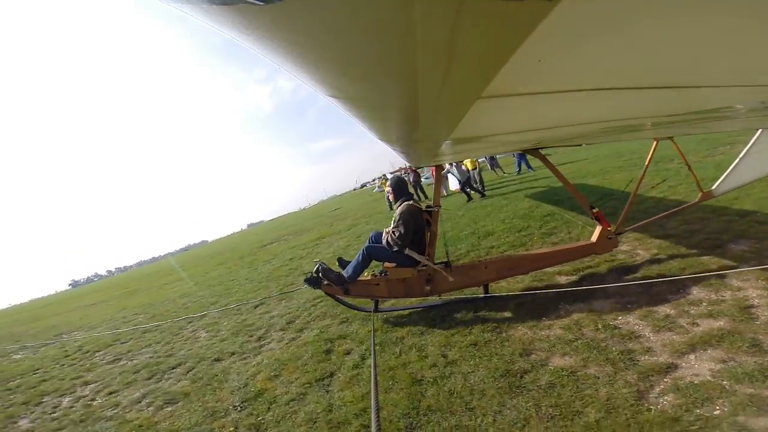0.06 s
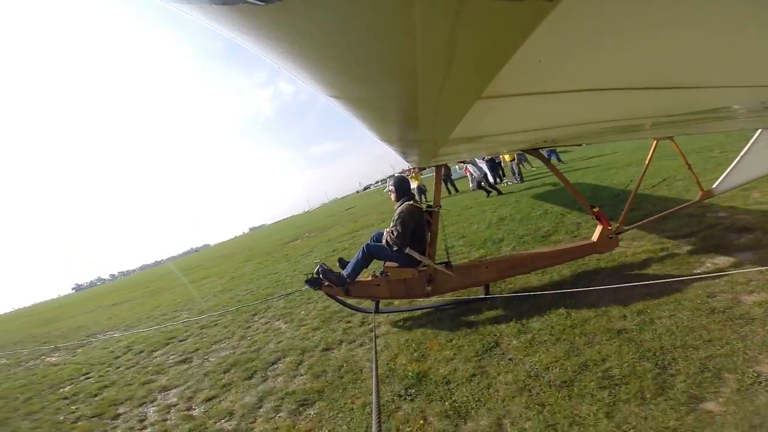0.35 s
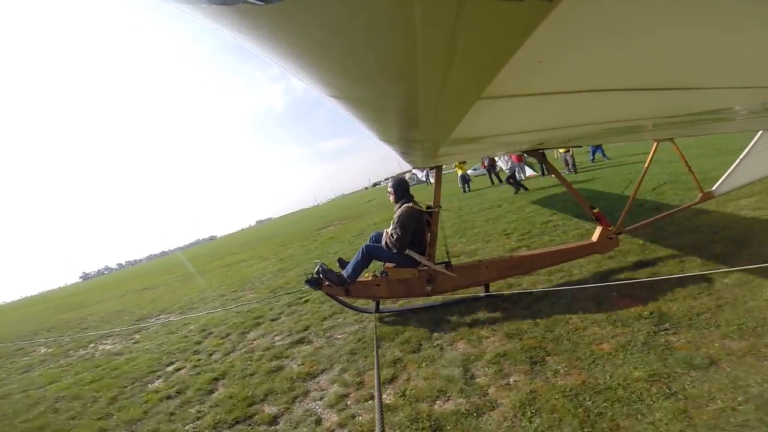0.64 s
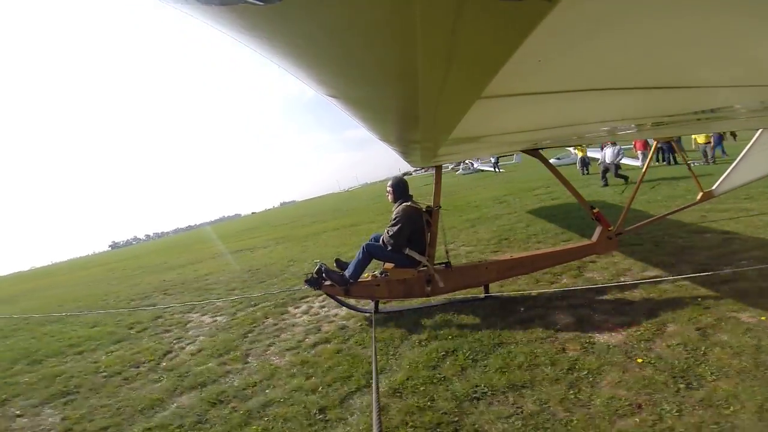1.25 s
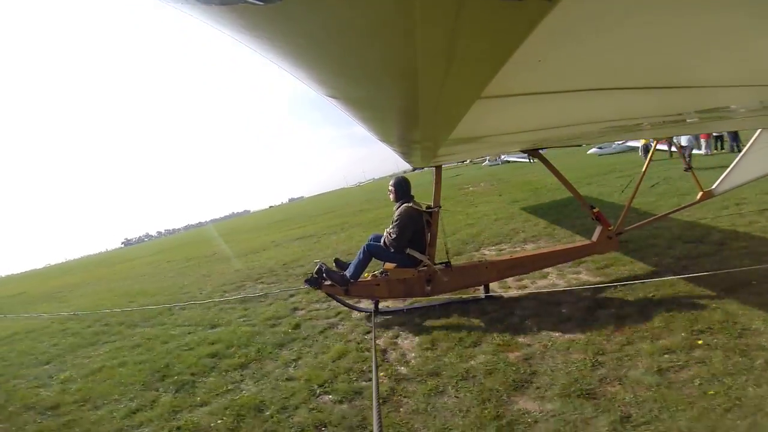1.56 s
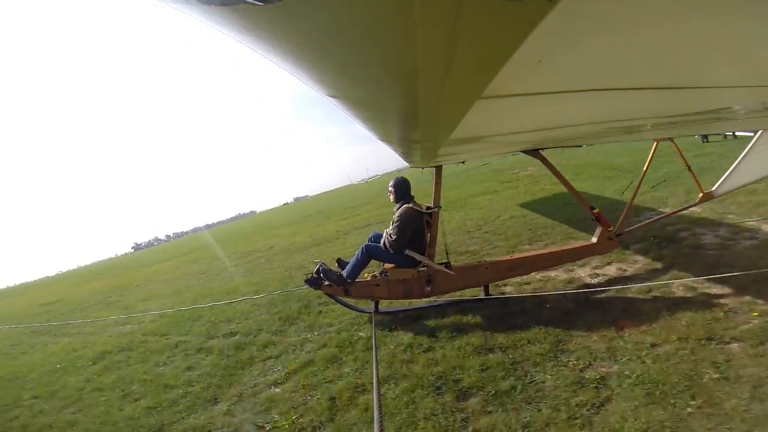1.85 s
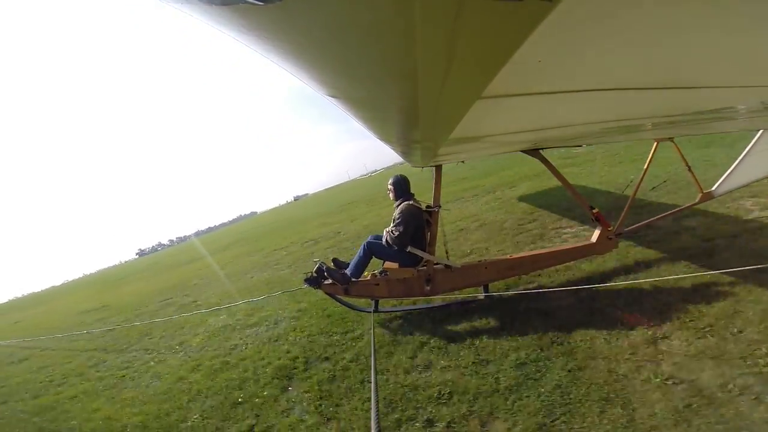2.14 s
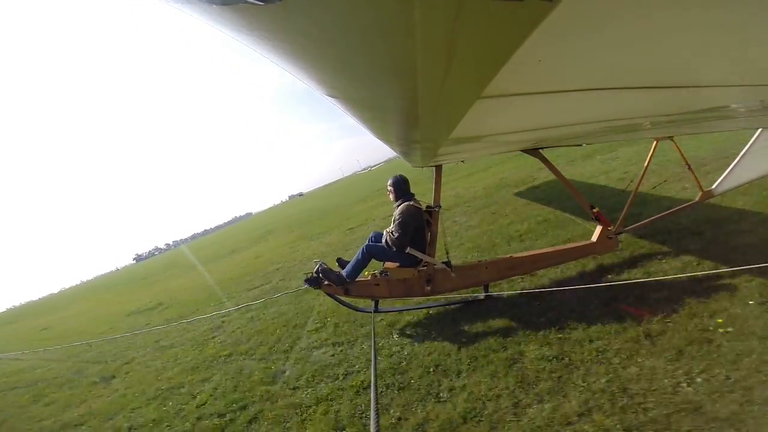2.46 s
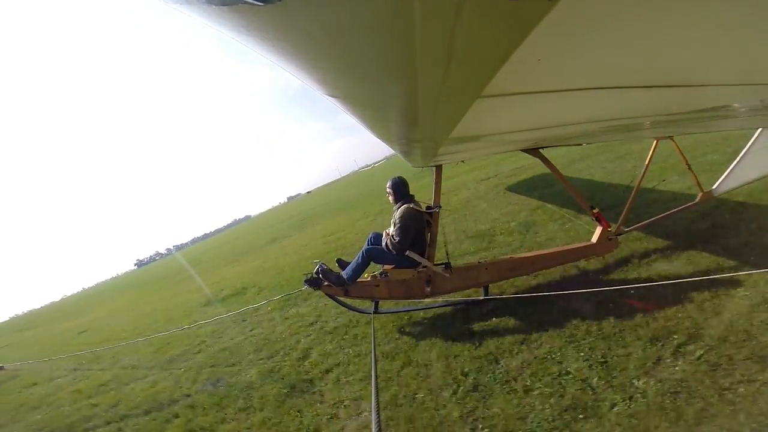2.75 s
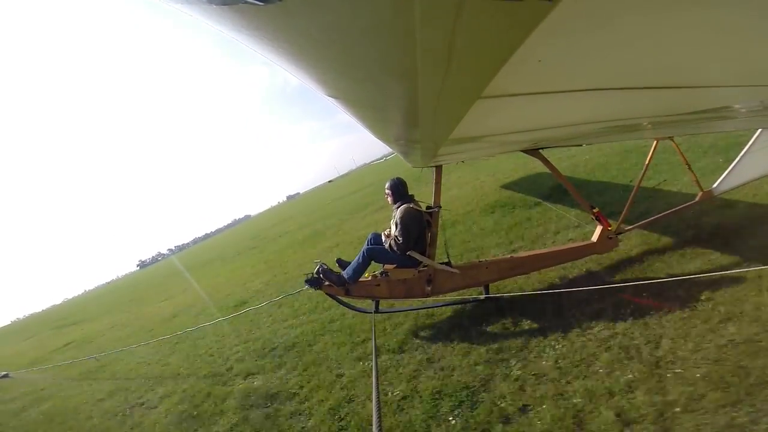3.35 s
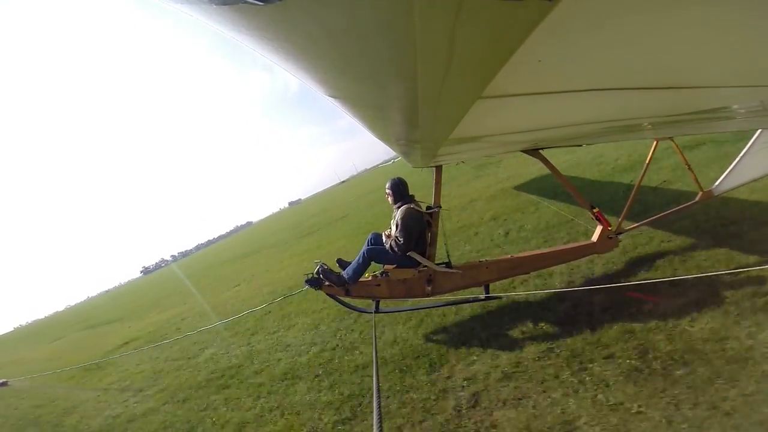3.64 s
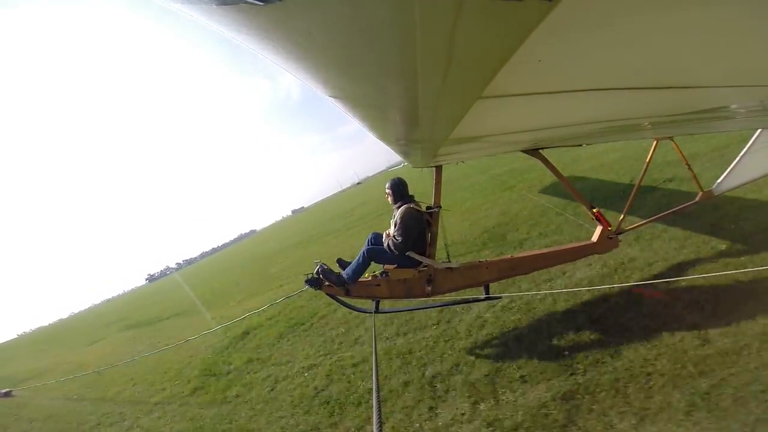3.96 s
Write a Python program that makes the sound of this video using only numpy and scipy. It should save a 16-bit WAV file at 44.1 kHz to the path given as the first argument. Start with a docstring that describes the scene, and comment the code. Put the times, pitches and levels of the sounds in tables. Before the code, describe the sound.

A glider's skid scrapes and bumps over grass, rattling, then lifts into whistling wind.

```python
"""A wooden glider's skid scrapes and bumps over a grass field under tow, heard from a microphone on the wing.
The ground shakes the wing in a few deep modes and jolts the fuselage; close by, loose fittings chatter,
struts rattle and a metal joint clanks. As the glider lifts the scrape dies away, leaving the wind
on the microphone and the rising whistle of the bracing wires."""
import sys
import numpy as np
from scipy import signal
from scipy.fft import rfft, irfft
from scipy.io import wavfile

SR = 44100
rng = np.random.default_rng(int(sys.argv[2]) if len(sys.argv) > 2 else 0)


def digitize_waveform(pressure):
    """Quantize a signal to 16-bit integers and store it at the path in sys.argv[1].

    Rows of a 2-D input are taken as channels; values are limited to [-1, 1].
    """
    field = np.atleast_2d(pressure).T
    bounded = np.clip(field, -1, 1)
    quanta = np.round(bounded * 32767).astype(np.int16)
    wavfile.write(sys.argv[1], SR, quanta)


N = 176400
TIME = np.arange(N) / SR
LIFT_S, LIFT_DB_PER_S = 3.47, 37  # the skid leaves the ground; how fast its scrape and the rattle fade


def amp(db):
    """Decibels to gain."""
    return 10 ** (np.asarray(db) / 20)


def unit(x):
    """Scales to an rms of one."""
    return x / np.sqrt(np.mean(abs(x) ** 2) + 1e-20)


def curve(rows, column=1):
    """One column of a time table, at every sample."""
    rows = np.array(rows)
    return np.interp(TIME, rows[:, 0], rows[:, column])


def add(mix, start_s, sound):
    """Mixes a sound in at a time."""
    part = mix[max(0, round(start_s * SR)):][:len(sound)]
    part += sound[:len(part)]


def colour(x, spectrum, peaks=(), size=8192):
    """Causal filter of unit energy from a spectrum and its resonances."""
    hz = np.fft.rfftfreq(size, 1 / SR)
    points_hz, points_db = np.transpose(spectrum)
    shape_db = np.interp(np.log(hz + 1), np.log(points_hz + 1), points_db)
    shape_db += sum(db / (1 + (2 * (hz - centre) / width) ** 2) for centre, width, db in peaks)
    cepstrum = irfft(np.log(amp(shape_db)))
    cepstrum[1:size // 2] *= 2  # folded for minimum phase
    cepstrum[size // 2 + 1:] = 0
    response = irfft(np.exp(rfft(cepstrum)))[:size // 2]
    return signal.oaconvolve(x, response / np.linalg.norm(response))[:len(x)]


def drift(rate_hz):
    """Complex random wander, with little above the rate."""
    noise = rng.standard_normal(N) + 1j * rng.standard_normal(N)
    return unit(np.fft.ifft(np.fft.fft(noise) / (1 + (np.fft.fftfreq(N, 1 / SR) / rate_hz) ** 4)))


def swing(hz, width_hz, steady):
    """A randomly driven resonance whose swing is evened out by `steady`, from 0 to 1."""
    envelope = drift(width_hz * 0.75)
    envelope /= (abs(envelope) ** 2 + 0.16) ** (steady / 2)
    carrier = np.exp(2j * np.pi * np.cumsum(hz * np.ones(N)) / SR)
    return unit((envelope * carrier).real)


def ring(modes, t):
    """Decaying modes of a struck part."""
    return sum(amp(db - 60 * t / t60) * np.sin(2 * np.pi * (hz * t + rng.random()))
               for hz, db, t60 in modes)


def burst(t, decay_s, rise=1):
    """A dying scuff of noise with unit energy."""
    scuff = rng.choice([-1, 1], len(t)) * rise * np.exp(-t / decay_s)
    return scuff / np.linalg.norm(scuff)


# wind right at the microphone: t/s, level/dB
WIND_LEVEL = [(0, -35), (1.5, -31), (3.3, -29), (4, -34)]
# its spectrum: f/Hz, relative level/dB
WIND_SPECTRUM = [(10, 6.5), (27, 22.5), (40, 20), (100, 9.5), (190, 7), (330, 4), (500, -6.5), (900, -3.5),
                 (1300, -13), (1600, -16.5), (2700, -22.5), (3500, -30.5), (6000, -51.5), (8000, -57),
                 (15000, -64)]

def wind(gust_db=4.5, gust_hz=8):
    """Air buffets the microphone in gusts, out in the open on the wing."""
    level_db = curve(WIND_LEVEL) + gust_db * drift(gust_hz).real
    return amp(level_db) * unit(colour(rng.standard_normal(N), WIND_SPECTRUM))


# airflow over the wing: t/s, level/dB
RUSH_LEVEL = [(0, -59), (2.5, -54), (3.5, -53), (3.75, -44), (4, -39.5)]
# its spectrum: f/Hz, relative level/dB
RUSH_SPECTRUM = [(200, -4.5), (600, 2), (1300, 3.5), (1600, 5.5), (2100, -2.5), (2750, -5.5), (3100, -12),
                 (4200, -17.5), (6200, -22.5), (7200, -34.5), (10000, -35.5), (15000, -44)]

def rush():
    """Air hisses past the wing around the microphone, louder with speed."""
    return amp(curve(RUSH_LEVEL)) * unit(colour(rng.standard_normal(N), RUSH_SPECTRUM))


# whistle of the wires: t/s, f/Hz, level/dB
WHISTLE = [(2.9, 985, -66), (3.49, 1061, -41.5), (3.59, 1098, -44), (3.68, 1130, -40.5), (3.8, 1150, -36.5),
           (3.88, 1128, -35.5), (4, 1150, -32.5)]
# its tones: pitch ratio, width/Hz, relative level/dB
WHISTLE_TONES = [(1, 48.6, -2), (1.13, 160, -7)]

def wires(steady=0.17):
    """The bracing wires, a little way along the wing, whistle higher and louder with airspeed."""
    pitch_hz = curve(WHISTLE)
    tones = sum(amp(db) * swing(ratio * pitch_hz, width, steady) for ratio, width, db in WHISTLE_TONES)
    return amp(curve(WHISTLE, column=2)) * tones


# crunching grass: t/s, level/dB
CRUNCH_LEVEL = [(.42, -74), (.6, -43.5), (.85, -60), (.99, -59), (1.06, -67), (1.48, -74), (1.82, -55),
                (1.98, -77), (2.17, -64), (2.3, -43), (2.39, -58.5), (2.6, -43), (2.78, -52), (3.05, -46.5),
                (3.3, -55), (3.5, -65), (4, -92)]
# bright spectrum of stalks and fittings alike: f/Hz, relative level/dB
CRACKLE_SPECTRUM = [(200, -32.5), (900, 4.5), (1800, 8), (2700, 8), (3900, -9), (4800, 2), (5450, -3),
                    (6300, 1.5), (7300, -2.5), (8600, -16), (10700, -15.5), (11400, -21), (12500, -19.5),
                    (13500, -19), (14300, -26), (16000, -39)]

def grass(cracks_per_s=2800, clump_db=23, clump_hz=109):
    """Down at ground level, stalks crunch under the skid in short clumps."""
    cracks = rng.standard_normal(N) * (rng.random(N) < cracks_per_s / SR)
    clumps = amp(clump_db * np.tanh(2.1 * drift(clump_hz).real))
    return amp(curve(CRUNCH_LEVEL)) * unit(colour(cracks * clumps, CRACKLE_SPECTRUM))


# modes of the wooden struts: f/Hz, relative level/dB, t60/s
STRUT_MODES = [(919, 2, 0.064), (1504, 3, 0.058), (1675, 1.5, .045)]

def struts(level_db=-48, follow=0.57, taps_per_s=140, vary_db=4, detune=0.037, rise_s=0.0008):
    """Nearby struts tap in their sockets, each tap its own colour, harder as the skid digs in."""
    taps, t = np.zeros(N), np.arange(SR // 10) / SR
    scrape_db = curve(SCRAPE_LEVEL)
    push_db = follow * (scrape_db - scrape_db.mean()) - lift_loss_db()
    for at in np.flatnonzero(rng.random(N) < taps_per_s / SR):
        modes = [(hz * (1 + detune * rng.standard_normal()), db + vary_db * rng.uniform(-1, 1), t60)
                 for hz, db, t60 in STRUT_MODES]
        add(taps, at / SR, amp(push_db[at]) * (1 - np.exp(-t / rise_s)) * ring(modes, t))
    return amp(level_db) * unit(taps)


# knocks of a metal joint: t/s, relative level/dB, pitch ratio, tilt of the ring/(dB per octave)
JOINT_KNOCKS = [(.924, -42, 1.1, 2), (1.663, -25, 1.02, -1.5), (2.018, -23.5, .995, 1.5),
                (2.487, -33, 1, 4)]
# its modes: f/Hz, relative level/dB, t60/s
JOINT_MODES = [(942, -1.5, .05), (1510, 0.5, 0.044), (1680, 1, 0.04), (1985, -6, .04), (2500, 3, 0.036),
               (3800, -11, 0.024), (4760, -8, 0.023)]
# spectrum of its grinding, also of knocks on the wood: f/Hz, relative level/dB
GRIND_SPECTRUM = [(200, -1.5), (900, -5), (2600, -5), (3500, -15), (7000, -24), (12000, -45)]

def clanks(gain_db=-13, grind_db=-1, grind_s=0.0072, rise_s=0.0044):
    """A joint close by grinds briefly and rings in its modes, duller or brighter with each knock."""
    out, t = np.zeros(N), np.arange(SR // 5) / SR
    rise = 1 - np.exp(-(t / rise_s) ** 2)
    for start, db, pitch, tilt_db in JOINT_KNOCKS:
        modes = [(hz * pitch, mode_db + tilt_db * np.log2(hz), t60) for hz, mode_db, t60 in JOINT_MODES]
        ringing = unit(rise * ring(modes, t))
        grinding = unit(rise * colour(burst(t, grind_s), GRIND_SPECTRUM))
        add(out, start, amp(db + gain_db) * (ringing + amp(grind_db) * grinding))
    return out


def contact(decay_s=0.0012, spread=0.58, tilt_db=0.75, size=1024):
    """A loose part scuffs for a millisecond or two, each time with its own length and brightness."""
    length, brightness = np.clip(rng.standard_normal(2), -2, 2)
    age = np.arange(size) / SR / (decay_s * np.exp(spread * length))
    scuff = rng.choice([-1, 1], size) * np.sqrt(age) * np.exp(-age)
    octaves = np.log2(np.clip(np.fft.rfftfreq(size * 2, 1 / SR), 2000, None) / 6000)
    scuff = irfft(rfft(scuff, size * 2) * amp(tilt_db * brightness * octaves))[:size]
    return scuff / np.linalg.norm(scuff)


def throw(shake, db_per_rms=6.5, limit_rms=2.44, waver_db=-0.5, waver_hz=6.1):
    """The chatter's gain rises with the airframe's acceleration, up to a limit, and wavers slightly."""
    motion = signal.sosfiltfilt(signal.butter(2, 200, fs=SR, output="sos"), shake)
    acceleration = unit(np.gradient(np.gradient(motion)))
    waver = np.tanh(2 * drift(waver_hz).real)
    return amp(db_per_rms * np.minimum(abs(acceleration), limit_rms) + waver_db * waver)


# chatter of loose fittings: t/s, level/dB
CHATTER_LEVEL = [(0, -56), (.5, -44.5), (.72, -45), (.84, -50), (.95, -46), (1.3, -55), (1.48, -49.5),
                 (1.6, -47.5), (1.93, -45), (1.98, -51.5), (2.18, -43.5), (2.39, -48), (2.6, -49.5),
                 (2.78, -55), (3.17, -47.5), (3.42, -51), (3.53, -59), (4, -67)]
# single snaps of a fitting: t/s, relative level/dB
FITTING_SNAPS = [(0.019, -35.5), (0.1161, -32), (0.307, -28), (0.421, -23.5), (0.469, -31), (0.4823, -25.5),
                 (0.492, -36), (0.533, -24), (0.5921, -26), (0.609, -25.5), (0.6749, -26.5), (0.7578, -27),
                 (0.799, -28.5), (0.897, -29.5), (0.9333, -28), (0.954, -26.5), (0.9752, -22),
                 (0.9949, -23.5), (1.054, -25.5), (1.067, -28), (1.1078, -27.5), (1.13, -26.5),
                 (1.2126, -27.5), (1.2464, -26.5), (1.2673, -36), (1.3795, -25), (1.41, -27.5),
                 (1.706, -29.5), (1.7896, -25.5), (1.833, -22.5), (1.872, -27.5), (1.914, -35),
                 (2.088, -27), (2.211, -26.5), (2.2569, -28), (2.582, -22), (2.593, -39), (2.606, -25.5),
                 (2.6968, -29), (2.7557, -32), (2.804, -31), (3.15, -27.5), (3.272, -41), (3.347, -42),
                 (3.39, -32)]

def fittings(shake, start_per_s=45, growth_per_s2=45, spread_db=4.5, snap_db=14, knock_db=-6, tail_db=-13):
    """Fittings around the microphone chatter ever faster; now and then one snaps and knocks the wood."""
    chatter, snaps, t = np.zeros(N), np.zeros(N), np.arange(SR // 20) / SR
    contacts_per_s = start_per_s + growth_per_s2 * TIME
    for at in np.flatnonzero(rng.random(N) < contacts_per_s / SR):
        add(chatter, at / SR, amp(spread_db * min(rng.exponential(), 2.5)) * contact())
    for start, db in FITTING_SNAPS:
        add(snaps, start, amp(db + snap_db) * burst(t, decay_s=0.0008, rise=np.sqrt(t)))
    hits = unit(chatter * throw(shake)) * amp(curve(CHATTER_LEVEL)) + snaps
    knocks = signal.oaconvolve(snaps, burst(t, decay_s=0.006))[:N]
    wood = colour(knocks, GRIND_SPECTRUM, FRAME_RESONANCES)
    tail = signal.oaconvolve(hits, burst(t, decay_s=0.0035))[:N]  # the structure rings on
    return colour(hits + amp(tail_db) * tail, CRACKLE_SPECTRUM) + amp(knock_db) * wood


# jolts of the fuselage: t/s, relative level/dB
JOLTS = [(0.173, -15), (0.461, -17), (.775, -18.5), (0.986, -12.5), (1.138, -15.5), (1.604, -16),
         (1.821, -18.5), (2.175, -10), (2.247, -15), (2.329, -11), (2.474, -19.5), (2.685, -12.5),
         (2.752, -8), (2.83, -17.5), (3.088, -12), (3.189, -15.5), (3.271, -10), (3.301, -13.5)]
# its modes: f/Hz, relative level/dB, t60/s
FUSELAGE_MODES = [(87.7, 7.5, 0.087), (124.6, 2, 0.082), (157, -8.5, 0.034), (241, -19, .06),
                  (325, -20.5, 0.057), (466, -18, 0.027)]

def thuds(rise_s=0.0024):
    """Jolts knock the wooden fuselage, inboard of the microphone."""
    out, t = np.zeros(N), np.arange(SR // 5) / SR
    rise = 1 - np.exp(-(t / rise_s) ** 2)
    for start, db in JOLTS:
        add(out, start, amp(db) * rise * ring(FUSELAGE_MODES, t))
    return out


# sway in the wing's lowest mode: t/s, level/dB
SWAY_LEVEL = [(0.0, -24.5), (0.2, -12.5), (0.82, -11), (0.91, -16), (1.48, -11.5), (1.51, -28.5),
              (1.6, -8.5), (1.84, -15), (1.88, -11.5), (1.96, -29.5), (2.03, -10.5), (2.64, -18.5),
              (3.11, -13.5), (3.17, -19.5), (3.55, -11), (3.62, -30.5), (3.8, -16.5), (3.86, -23.5)]
# shudder in its higher modes: t/s, level/dB
SHUDDER_LEVEL = [(0.0, -23.5), (0.2, -23), (0.24, -28.5), (0.46, -14), (0.95, -24.5), (0.99, -13.5),
                 (1.05, -20.5), (1.15, -16.5), (1.21, -26), (1.41, -18), (1.5, -20.5), (1.76, -19.5),
                 (1.83, -9.5), (1.97, -26), (2.27, -16.5), (2.41, -24.5), (2.48, -13.5), (2.53, -31.5),
                 (2.58, -10.5), (2.91, -21.5), (3.29, -19), (3.34, -30.5), (3.39, -20.5), (3.71, -21.5),
                 (4.0, -38.5)]
# those higher modes: f/Hz, width/Hz, relative level/dB
WING_MODES = [(95, 16.7, -1), (122.6, 28.3, -7)]

def wing(sway_hz=54.5, sway_width_hz=14.6, steady=0.44):
    """The ground shakes the wing in its deep modes, directly under the microphone."""
    sway = amp(curve(SWAY_LEVEL)) * swing(sway_hz, sway_width_hz, steady)
    shudder = sum(amp(db) * swing(hz, width, steady) for hz, width, db in WING_MODES)
    return sway + amp(curve(SHUDDER_LEVEL)) * shudder


def lift_loss_db():
    """The level lost as the skid lifts off the field."""
    return LIFT_DB_PER_S * np.maximum(TIME - LIFT_S, 0)


def grains(per_s=2400, spread_db=2):
    """Dense tiny impacts of stalks and soil."""
    size = amp(spread_db * np.minimum(rng.exponential(1, N), 4))
    return unit(size * rng.standard_normal(N) * (rng.random(N) < per_s / SR))


# scrape of the skid, before the lift fades it: t/s, level/dB
SCRAPE_LEVEL = [(0, -31), (.09, -51), (.17, -32), (.24, -55.5), (.33, -38), (.46, -42), (.57, -32.5),
                (.75, -31.5), (.83, -45.5), (.95, -40.5), (1.03, -44), (1.34, -45.5), (1.47, -43),
                (1.58, -32), (1.72, -40), (1.85, -26.5), (1.92, -45.5), (2.02, -34.5), (2.2, -34.5),
                (2.39, -50.5), (2.48, -28), (2.53, -38.5), (2.6, -34.5), (2.73, -29), (2.79, -43.5),
                (2.95, -36.5), (3.02, -47.5), (3.15, -34), (3.36, -39), (3.55, -41)]
# hummocks in its path: t/s, length/s, relative level/dB
HUMMOCKS = [(0.973, 0.027, -23), (0.985, 0.035, -29), (1.125, 0.015, -24.5), (1.759, 0.045, -25),
            (1.81, 0.06, -32), (2.15, 0.043, -25), (2.253, 0.022, -27.5), (2.319, 0.02, -31),
            (2.53, 0.07, -27.5), (2.741, 0.021, -30.5), (2.806, 0.028, -31), (3.076, 0.019, -25),
            (3.23, 0.018, -34.5), (3.271, 0.015, -24.5)]
# spectrum of the scrape: f/Hz, relative level/dB
SCRAPE_SPECTRUM = [(60, -18.5), (150, 13), (220, -0.5), (320, 3.5), (490, -5.5), (620, -2), (1000, -3),
                   (1330, -14.5), (1700, -10.5), (2200, -13.5), (2750, -21.5), (3300, -19.5), (4200, -29),
                   (7000, -38.5), (15000, -74.5)]
# resonances of the frame: f/Hz, width/Hz, gain/dB
FRAME_RESONANCES = [(616, 60, 5.5), (731, 84, 7.5), (799, 14, -7), (924, 17, 5), (1164, 130, 8),
                    (1553, 40, 0), (2482, 89, 7.5)]

def skid(bump_db=1, tuft_db=2, tufts_hz=25):
    """The skid's scrape reaches the microphone through the frame, surging on tufts and hummocks."""
    push = amp(curve(SCRAPE_LEVEL) + tuft_db * drift(tufts_hz).real - lift_loss_db())
    for start, length, db in HUMMOCKS:
        age = np.maximum(TIME - start, 0) / (length / 2)  # the bump peaks at 1
        push = np.maximum(push, amp(db + bump_db) * age * np.exp((1 - age ** 2) / 2))
    return colour(push * grains(), SCRAPE_SPECTRUM, FRAME_RESONANCES)


def scene():
    """Everything that reaches the one microphone on the wing."""
    shake = wing() + thuds()
    mix = shake + skid() + struts() + grass() + wind() + rush() + wires() + clanks() + fittings(shake)
    return mix[None]


def record(dry, edge_hz=15200):
    """The recorder's band limit."""
    lowpass = signal.firwin(511, edge_hz, window=("kaiser", 9), fs=SR)
    return signal.oaconvolve(dry, lowpass[None], "same")


dry = scene()
out = record(dry)
digitize_waveform(out)
```